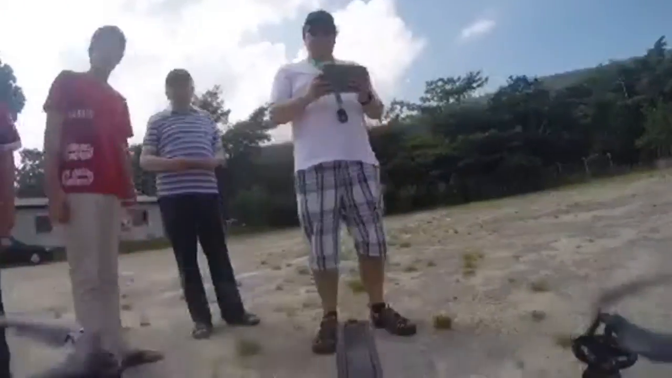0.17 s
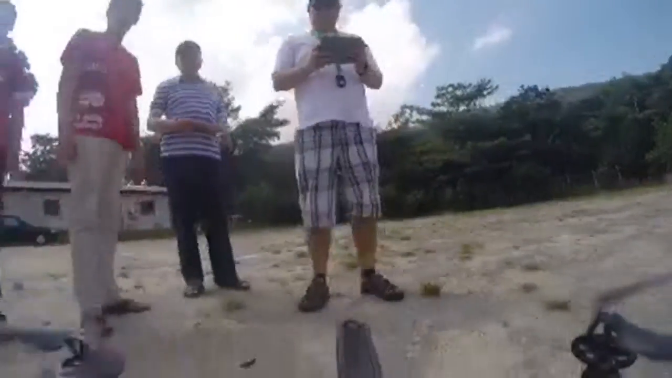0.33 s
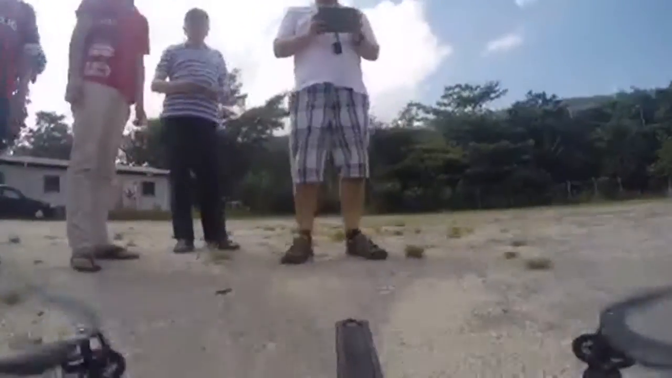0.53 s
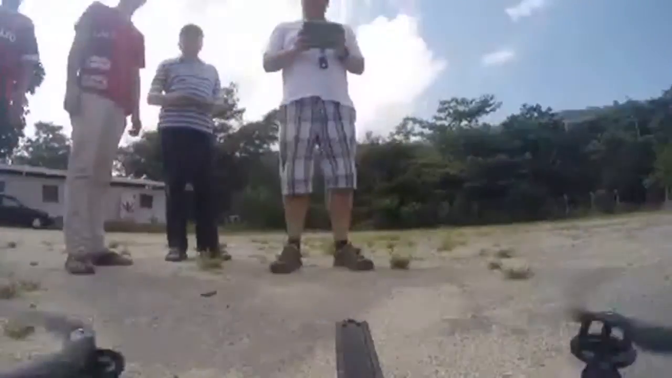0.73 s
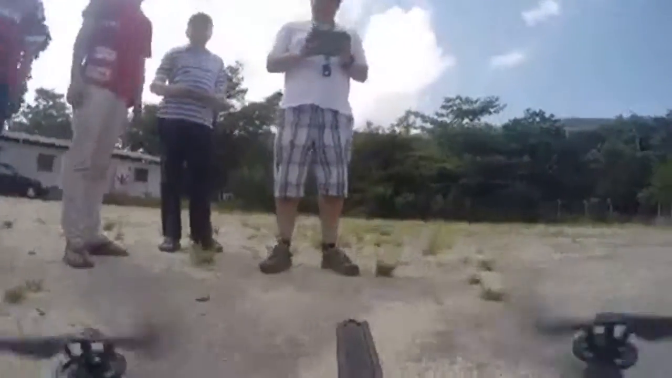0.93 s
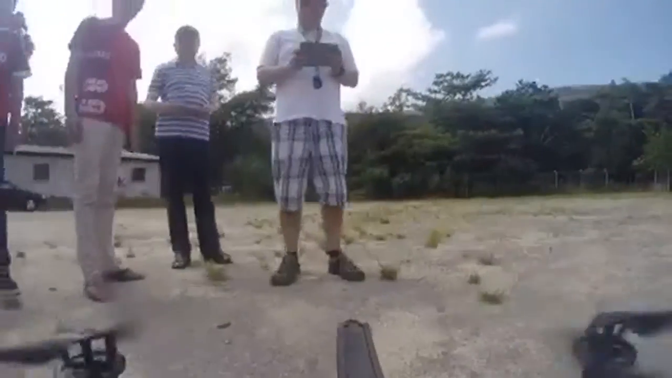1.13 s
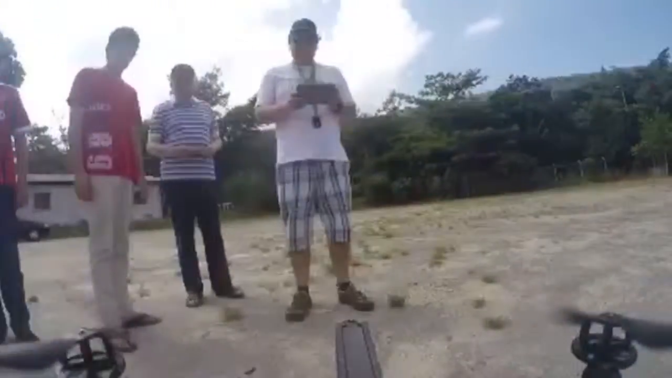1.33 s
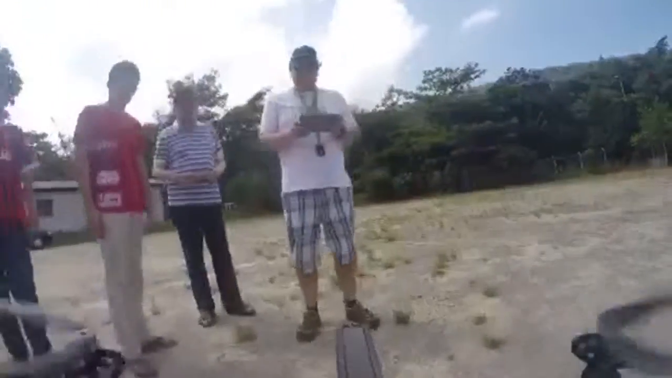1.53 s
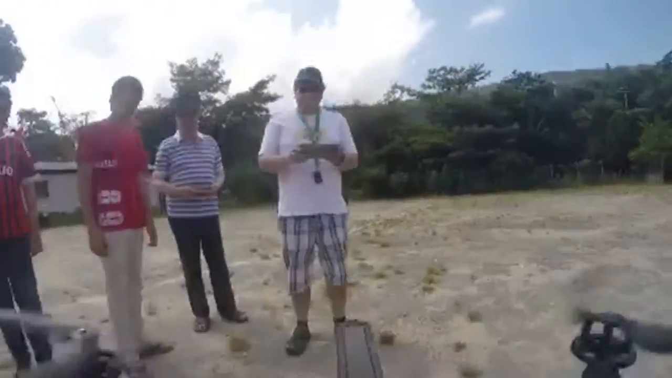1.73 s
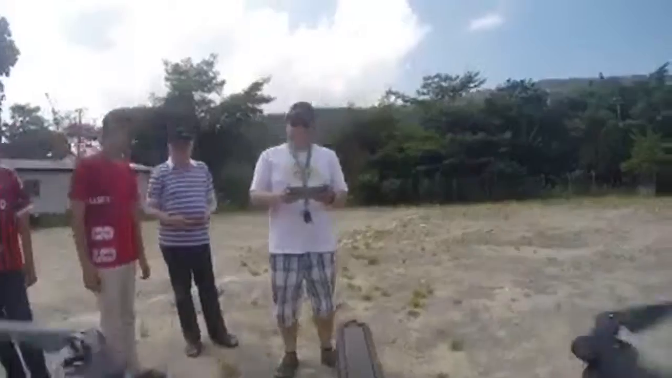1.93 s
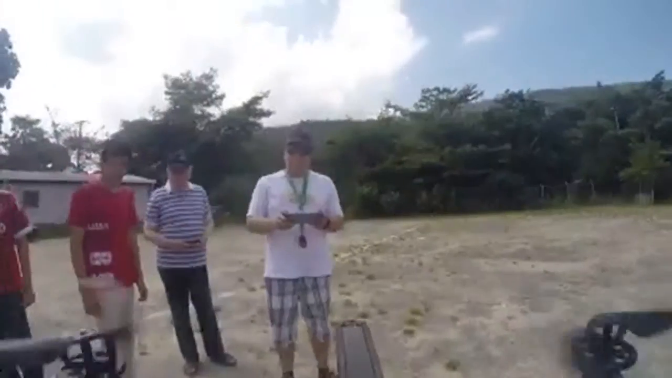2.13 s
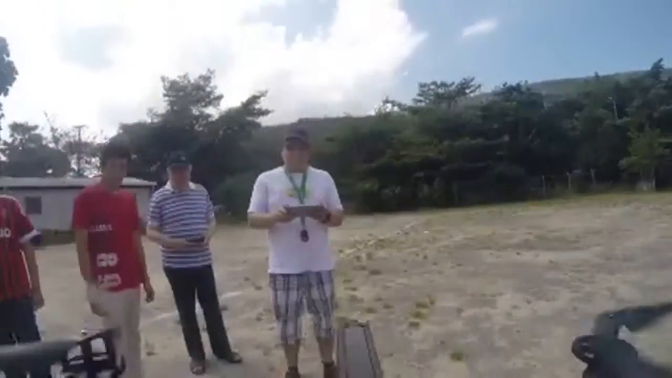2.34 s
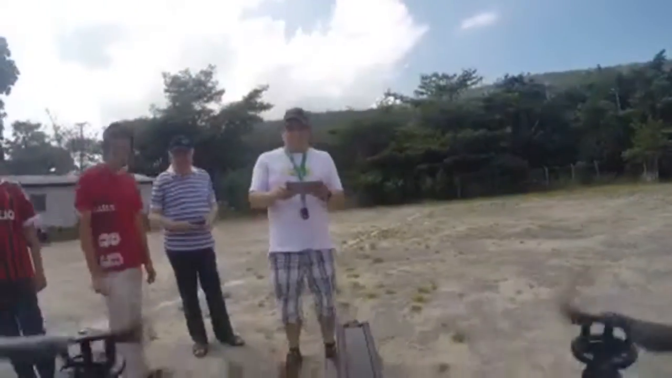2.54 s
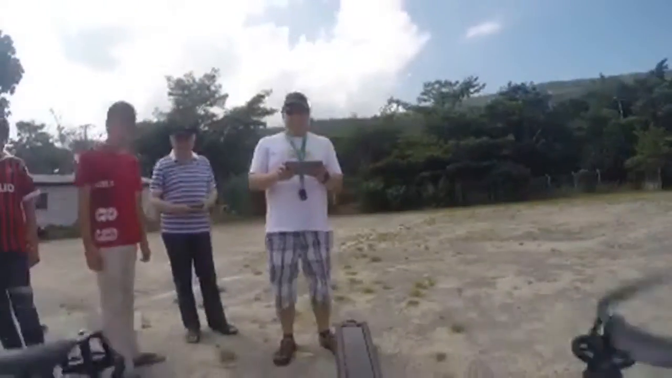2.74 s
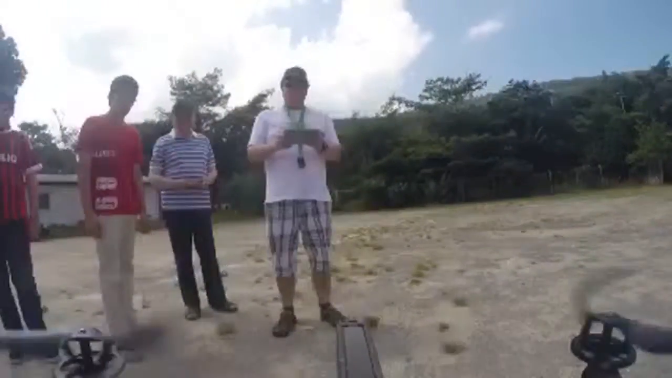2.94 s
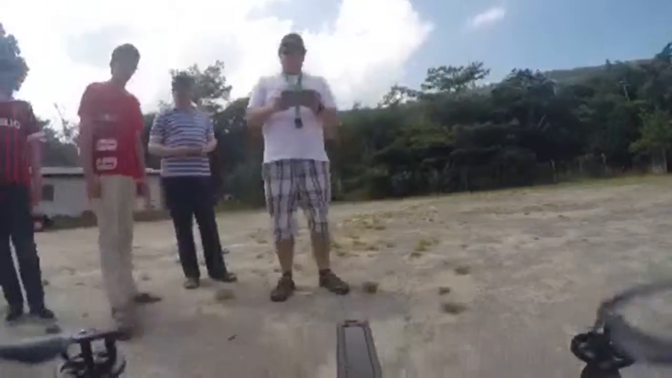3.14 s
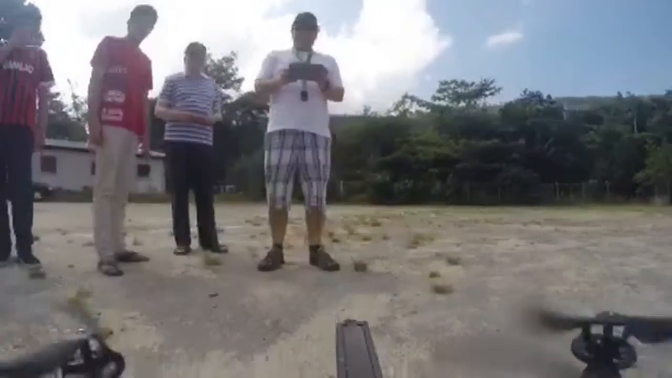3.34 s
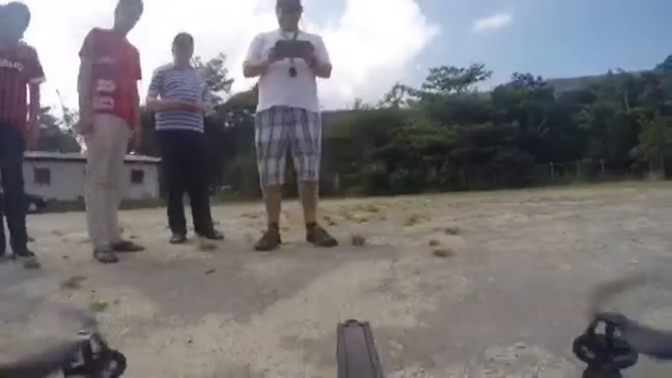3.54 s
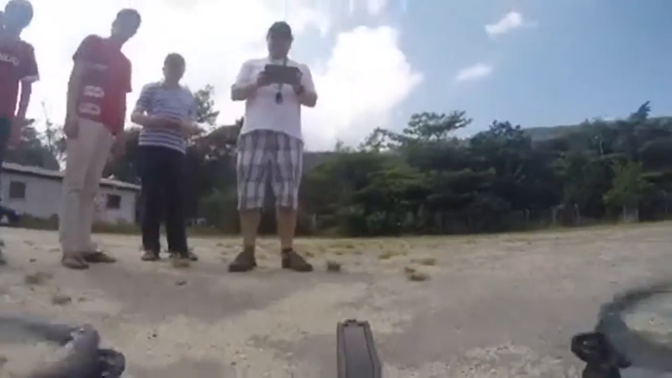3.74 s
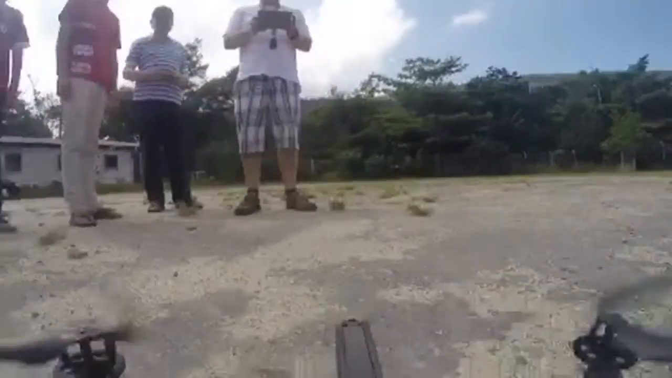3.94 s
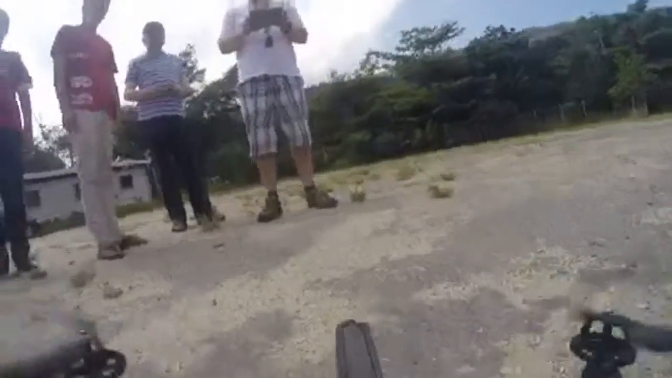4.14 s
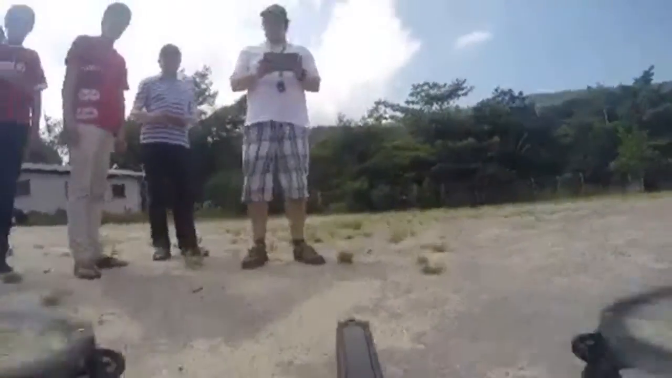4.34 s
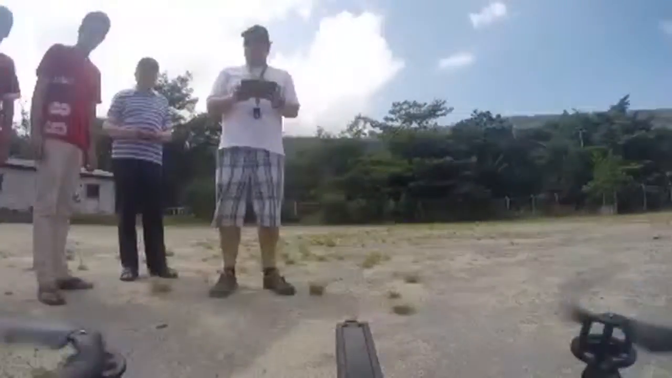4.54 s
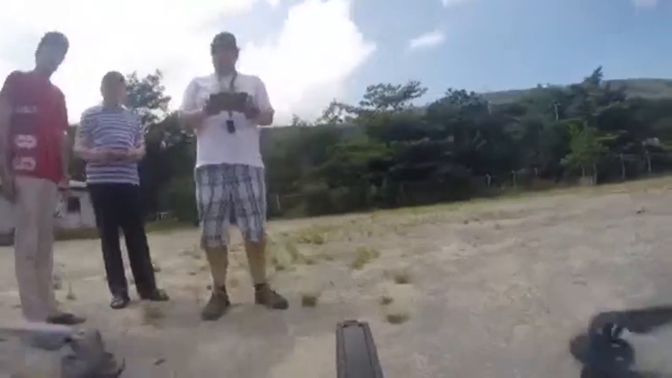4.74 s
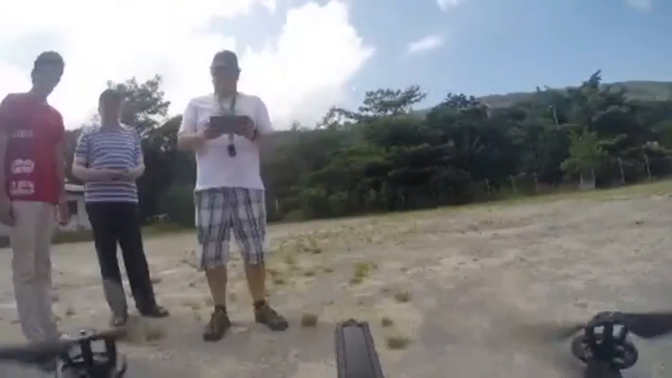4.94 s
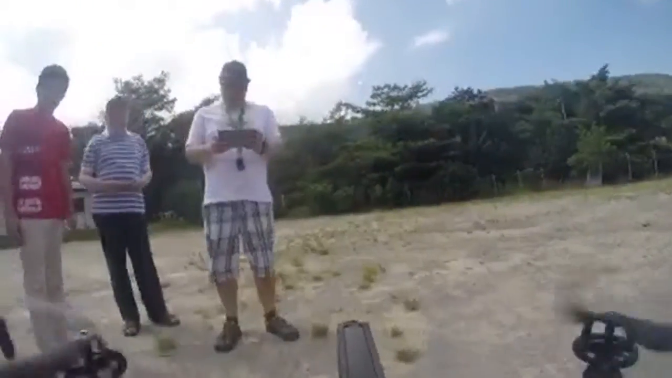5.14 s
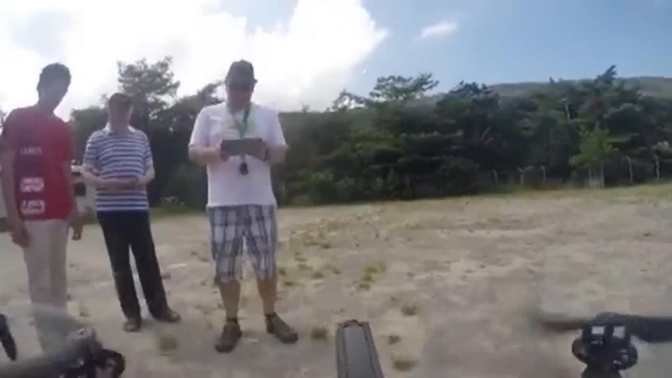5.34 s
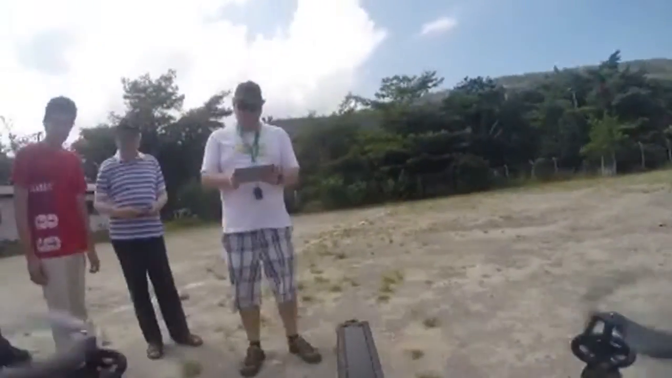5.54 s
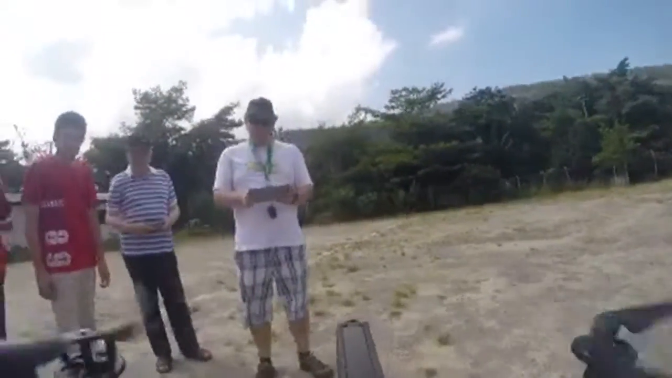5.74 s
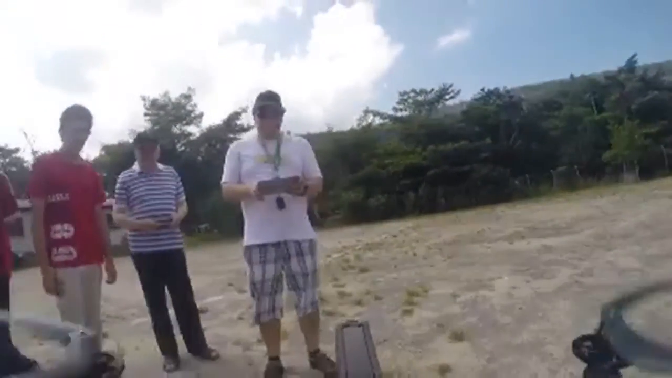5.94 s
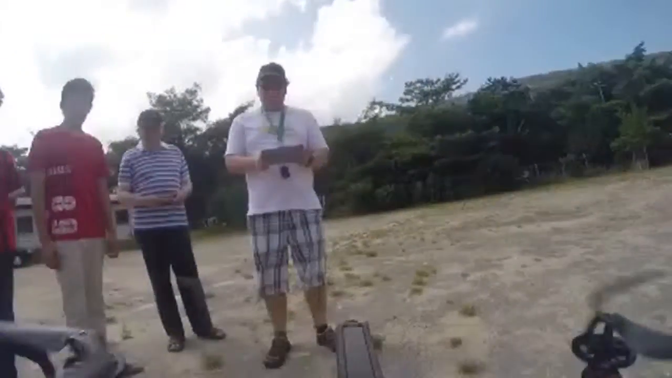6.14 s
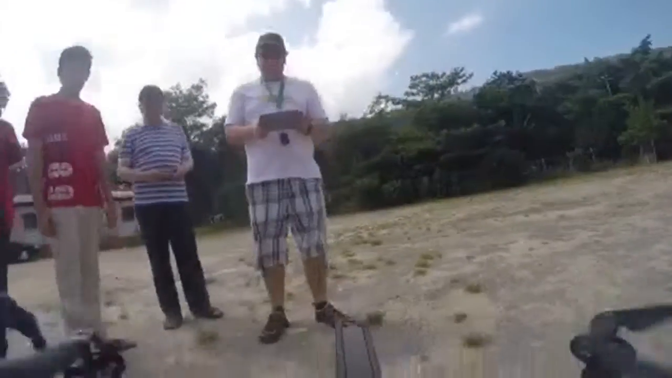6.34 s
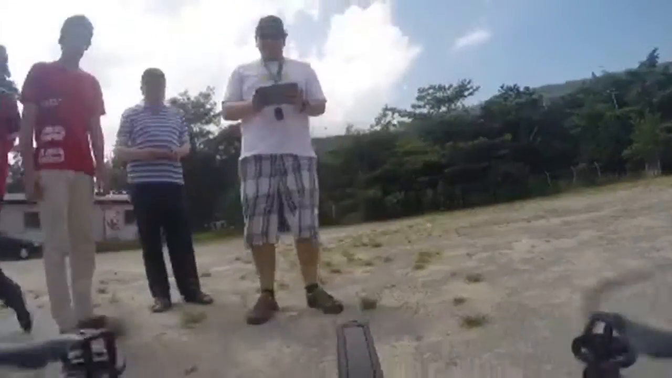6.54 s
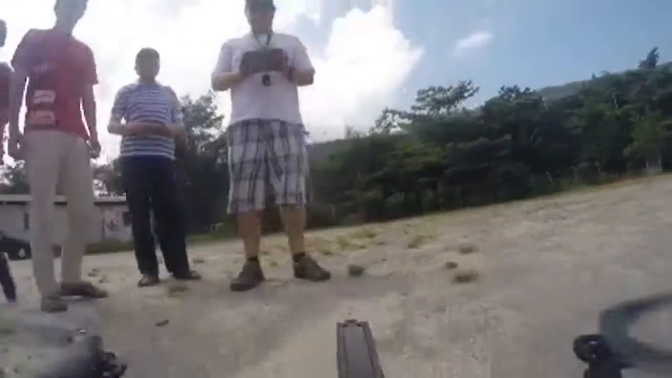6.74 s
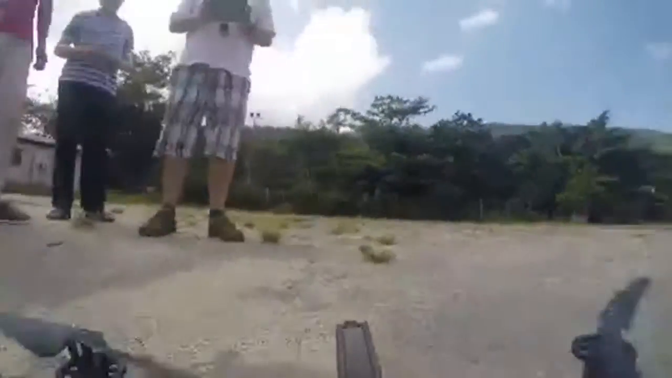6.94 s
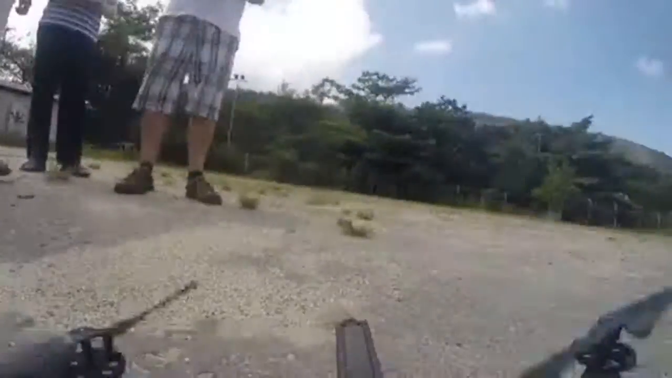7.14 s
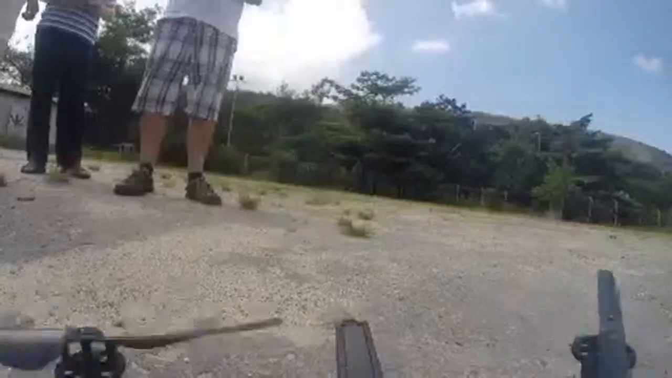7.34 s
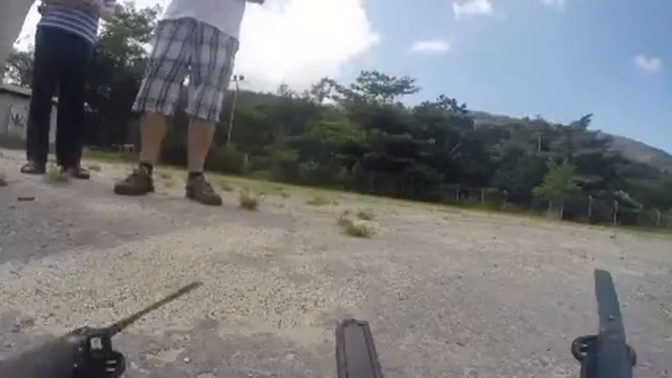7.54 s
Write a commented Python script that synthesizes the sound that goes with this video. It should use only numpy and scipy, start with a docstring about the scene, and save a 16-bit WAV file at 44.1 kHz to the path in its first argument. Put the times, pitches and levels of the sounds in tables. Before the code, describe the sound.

A small quadcopter flies low over open gravel, heard very close from a microphone on its frame. From the start, four rotors make a loud, throbbing hum, beating against each other over a low rumble of churned air, a raspy blade hiss and a thin motor whine. At about 0.7 seconds the skids touch with a light bump and crunch. The pitch dips at about 2 seconds, recovers by 3, and dips again near 5.8. Gusts roughen the sound here and there, especially between 4 and 4.7 seconds and around 6.6. At 6.9 seconds the motors cut abruptly as the craft thumps onto the gravel and bounces, hardest at about 7.1, with smaller knocks after. The coasting propellers clatter and growl, slowing and fading to a faint rest by about 7.7 seconds.

```python
"""A throbbing rotor hum, very close: a small quadcopter low over gravel, the camera microphone on its frame.
Four rotors at slightly different speeds beat against each other, shake the mount and churn the air,
with a thin motor whine on top. The skids touch once early on. Near the end the motors cut,
the craft drops on its skids and bounces, and the propellers clatter down to a faint rest."""
import sys
import numpy as np
from scipy import signal
from scipy.fft import rfft, irfft, next_fast_len
from scipy.io import wavfile
from scipy.ndimage import uniform_filter1d, minimum_filter1d

SR = 44100
rng = np.random.default_rng(int(sys.argv[2]) if len(sys.argv) > 2 else 0)


def pcm_store(signal):
    """Save signal as 16-bit PCM."""
    levels = np.round(np.clip(np.atleast_2d(signal), -1, 1) * 32767)
    wavfile.write(sys.argv[1], SR, levels.astype(np.int16).T)


N = 339129
T = np.arange(N) / SR
HOVER_HZ, CUT_S = 72, 6.915  # shaft speed at hover; when the motors lose power


def amp(db):
    """Decibels to gain."""
    return 10 ** (np.asarray(db) / 20)


def unit(x):
    """Scales to rms 1."""
    return x / np.sqrt(np.mean(x ** 2) + 1e-20)


def curves(rows):
    """Each column of a table as a function of time."""
    s, *columns = np.transpose(rows)
    return [np.interp(T, s, c) for c in columns]


def colour(x, spectrum):
    """Gives x a spectrum, at rms 1."""
    hz, db = np.transpose(spectrum)
    size = next_fast_len(N + 4096)
    f = np.fft.rfftfreq(size, 1 / SR)
    gain = amp(np.interp(np.log(f + 1), np.log(hz), db))
    return unit(irfft(rfft(x, size) * gain, size)[:N])


def wander(hz):
    """Smooth random drift of rms 1, rolled off above hz."""
    grid = T[::32]
    f = np.fft.rfftfreq(len(grid), grid[1])
    slow = irfft(rfft(rng.standard_normal(len(grid))) / (1 + (f / hz) ** 4), len(grid))
    return np.interp(T, grid, unit(slow))


def idle_tone(hz=10998, db=-84, start_s=7.12):
    """A faint electronic whistle stays once the motors are off."""
    return amp(db) * (T > start_s) * np.sin(2 * np.pi * hz * T)


# Coasting motors (stop time [s], starting pitch [Hz], level ahead of the mount [dB])
COASTING_MOTORS = [(7.47, 399, -26), (7.7, 1002, -30.5)]


def cogging(mount_hz=215):
    """Magnets cog past their poles: a falling growl, heard once low enough to pass the soft mount."""
    out = np.zeros(N)
    for stop, start_hz, db in COASTING_MOTORS:
        hz = start_hz * np.clip((stop - T) / (stop - CUT_S), 0, 1)
        passed = hz / np.hypot(hz, 45) / (1 + (hz / mount_hz) ** 8)
        rough = 1 + .6 * wander(30)
        phase = 2 * np.pi * np.cumsum(hz) / SR + .67 * wander(40)
        out += amp(db) * passed * rough * np.sin(phase)
    return out * (T > CUT_S)


# Spectra of propeller clatter and of gritty rattle or gravel (frequency [Hz], relative density [dB])
CLATTER_SPECTRUM = [(15, -12), (40, -3), (75, -3), (115, 0), (170, -1), (245, -2), (340, -16), (460, -14),
                    (650, -22), (850, -37), (3000, -70)]
GRIT_SPECTRUM = [(400, -15), (950, -6), (1280, 4), (1600, -8), (1950, 0), (2150, -6), (2400, -4),
                 (3000, -17), (4000, -17), (6000, -25), (15000, -42)]


def rundown(shaft_hz=50, slowing_s=0.5, coast_s=0.81, rest=0.11):
    """The coasting propellers shake the frame in ever slower, weaker pulses."""
    since = np.maximum(T - CUT_S, 0)
    motion = np.maximum(1 - since / coast_s, rest)
    turn = np.cumsum(shaft_hz * np.exp(-since / slowing_s)) / SR
    pulses = 1 + .43 * np.cos(4 * np.pi * turn)
    clatter = amp(-27.5) * colour(rng.standard_normal(N), CLATTER_SPECTRUM) * pulses
    rattle = amp(-51) * colour(rng.standard_normal(N) * amp(2.23 * wander(180)), GRIT_SPECTRUM)
    hiss = amp(-77) * colour(rng.standard_normal(N), FIZZ_SPECTRUM)
    onset = np.minimum(since / 0.011, 1)
    return onset * (motion ** .7 * clatter + motion ** .62 * rattle + hiss)


# Skids meeting the ground just below the microphone (time [s], thump level [dB], crunch level [dB])
TOUCHES = [(0.692, -21, -32.5), (6.903, -10, -28.5), (7.02, -17.5, -41), (7.092, -5.5, -30),
           (7.23, -32, -47.5), (7.555, -46, -61)]
# The frame on its skids and soft camera mount (frequency [Hz], relative level [dB], t60 [s])
FRAME_MODES = [(36.1, 0, 0.31), (56.3, -1, .2), (105, -8.5, 0.12), (248, -12, 0.046), (460, -17.5, 0.066)]


def skids(crunch_s=0.014, attack_s=0.0015):
    """Each touch rocks the frame and crunches the gravel."""
    out = np.zeros(N)
    gravel = colour(rng.standard_normal(N) * amp(4.7 * wander(400)), GRIT_SPECTRUM)
    for s, thump_db, crunch_db in TOUCHES:
        at = round(s * SR)
        t = T[:N - at]
        thump = sum(amp(db - 60 * t / t60) * np.sin(2 * np.pi * hz * t) for hz, db, t60 in FRAME_MODES)
        crunch = amp(crunch_db) * gravel[at:] * np.exp(-t / crunch_s)
        out[at:] += (crunch - amp(thump_db) * thump) * (1 - np.exp(-t / attack_s))
    return out


# The rotor nearest the microphone, throttled back twice, and the hardest working one
# (time [s], shaft speed [Hz])
NEAR_SPEED = [(0.0, 71.24), (0.3, 69.93), (0.52, 72.06), (0.8, 69.7), (0.9, 72.75), (1.91, 72.05),
              (2.01, 57.88), (2.73, 65.84), (3.0, 71.96), (3.91, 74.03), (4.04, 71.57), (4.29, 73.81),
              (5.03, 69.36), (5.3, 71.85), (5.7, 67.8), (5.8, 58.81), (6.32, 64.95), (6.9, 65.2)]
LOADED_SPEED = [(0, 74.4), (.38, 72), (.5, 73.8), (.72, 75.1), (.79, 70.7), (.92, 73.94), (1.92, 74.03),
                (2.03, 59.4), (2.2, 64.34), (2.5, 67.93), (2.9, 69.95), (3.5, 74.67), (4.05, 73.6),
                (4.7, 74.4), (5.6, 73.95), (5.78, 63.42), (5.95, 68.8), (6.9, 69.97)]
# How far the fast rotor runs above the near one, and the slow rotor below (time [s], speed gap [Hz])
FAST_LEAD = [(0.0, 3.63), (0.19, 7.34), (0.44, 4.92), (1.09, 5.04), (1.32, 6.3), (1.56, 2.58), (1.91, 6.6),
             (2.57, 8.7), (3.02, 6.1), (3.12, 3.16), (3.93, 3.9), (4.38, 6.67), (4.51, 5.29), (5.3, 6.5),
             (5.7, 8.4), (5.81, 4.58), (6.43, 8.17), (6.9, 6.1)]
SLOW_LAG = [(0.0, 0.96), (0.23, 2.84), (0.57, 0.69), (0.86, 4.38), (1.11, 1.53), (1.24, 3.5), (1.64, 4.21),
            (2.36, 2.32), (2.51, 5.37), (3.1, 2.177), (5.35, 2.82), (5.49, 4.64), (5.75, 2.18), (6.09, 5.1),
            (6.3, 2.43), (6.9, 1.65)]


def shafts(hunting_hz=.28):
    """Turns of the near, fast, slow and loaded rotor; their speed gaps set the throb."""
    near = curves(NEAR_SPEED)[0]
    fast = near + curves(FAST_LEAD)[0]
    slow = near - curves(SLOW_LAG)[0]
    loaded = curves(LOADED_SPEED)[0] + hunting_hz * wander(6)
    return [np.cumsum(hz) / SR for hz in (near, fast, slow, loaded)]


def singing(above_hz=72.2):
    """Fades from 0 to 1 as the loaded motor turns fast enough to hold a clean note."""
    return np.clip(curves(LOADED_SPEED)[0] - above_hz + .5, 0, 1)


def whine(turns, order=72, warble_hz=90):
    """Magnetic whine of the near motor and the loaded one, which turns ragged at low speed."""
    angle = 2 * np.pi * order * turns[3]
    clean = amp(-54 + 2 * wander(12)) * np.cos(angle + 0.73 * wander(45))
    drift = 2 * np.pi * np.cumsum(warble_hz * (wander(22) - .7)) / SR
    ragged = amp(-58.5 + 2 * wander(15)) * np.cos(angle + drift + 1.1 * wander(130))
    near = amp(-62 + 4 * wander(5)) * np.cos(2 * np.pi * order * turns[0] + 8 * wander(8) + wander(80))
    return singing() * clean + (1 - singing()) * ragged + near


def whistle(hover_pitch_hz=9800, swoop_hz=170, db_per_octave=-6):
    """A breathy motor whistle, lower and louder as the shaft slows."""
    hz = hover_pitch_hz * (curves(NEAR_SPEED)[0] / HOVER_HZ) ** 1.7
    phase = 2 * np.pi * np.cumsum(hz + swoop_hz * wander(9)) / SR
    db = -66.5 + db_per_octave * np.log2(hz / hover_pitch_hz) + 4.1 * wander(12)
    return amp(db) * np.cos(phase + 1.5 * wander(220))


# The rotors bite into a gust or, below zero, slip into a lull
# (centre time [s], length [s], extra buffeting [dB], extra rasp [dB])
GUSTS = [(0.485, 0.19, 4.5, 3.5), (0.645, .14, 2, 1), (1.25, 0.26, 2, 4.5), (1.401, .1, 1, 2.5),
         (1.73, .2, 1, 5), (1.977, 0.22, 4, 5.5), (2.14, .09, -2, -4), (2.222, .09, -1, 6),
         (2.862, 0.073, 3, 4.5), (4.067, 0.36, 2.5, 4), (4.31, 0.32, 2.5, 3.5), (4.533, 0.2, 3, 4.5),
         (4.678, 0.22, 3, 4.5), (5.191, .14, 2.5, 1.5), (5.77, .16, -4, -4), (5.86, .12, 8, 3.5),
         (6.618, 0.2, 7, 4.5)]


def air_levels(turns, delay_s=0.03, churn_db_per_hz=0.0874):
    """Buffeting and rasp in dB: both swell just after the near and fast shafts oppose, and in gusts."""
    swell = -np.cos(2 * np.pi * np.interp(T - delay_s, T, turns[1] - turns[0]))
    churn_db = 1.07 * wander(11) + churn_db_per_hz * (curves(NEAR_SPEED)[0] - HOVER_HZ)
    buffet_db = -24.5 + 1.5 * swell + churn_db
    rasp_db = -43 + swell + churn_db
    for s, length, more_buffet_db, more_rasp_db in GUSTS:
        arch = np.cos(np.pi * np.clip((T - s) / length, -.5, .5)) ** 2
        buffet_db += more_buffet_db * arch
        rasp_db += more_rasp_db * arch
    return buffet_db, rasp_db


def chop(turns, sharpness, spread_db):
    """Noise that comes in a puff at each blade pass, no two puffs alike."""
    near, fast = (np.exp(sharpness * np.cos(4 * np.pi * turn) + 0.25 * np.cos(2 * np.pi * turn))
                  for turn in turns[:2])
    return (near + fast) * amp(spread_db * wander(240)) * rng.standard_normal(N)


# Blade hiss at close range (frequency [Hz], relative density [dB])
FIZZ_SPECTRUM = [(2000, -18.5), (3500, 1.5), (4600, -1), (5600, -3.5), (6500, -4.5), (7200, -3.5),
                 (7700, -6.5), (8500, -9.5), (9100, -11), (10000, -15), (11200, -14.5), (11800, -25),
                 (12800, -24), (13500, -16.5), (15000, -30), (17000, -39)]


def fizz(puffs, rasp_db, growth=1.31):
    """Crackling treble that grows faster than the rasp, so hard bites of air are brighter."""
    ticks = np.abs(wander(500)) * wander(370) * rng.standard_normal(N)
    db = np.mean(rasp_db) - 11.5 + growth * (rasp_db - np.mean(rasp_db))
    return amp(db) * colour(unit(puffs) + unit(ticks), FIZZ_SPECTRUM)


# Midrange of the blade noise (frequency [Hz], relative density [dB])
RASP_SPECTRUM = [(400, -21), (750, -4.5), (930, -5), (1250, 2), (1450, -3), (1700, 0.5), (1950, 1),
                 (2130, -2.5), (2400, -7), (2900, -9), (3100, -8.5), (3600, -26.5), (6000, -41)]
# Resonances of the arms and camera case (frequency [Hz], width [Hz], relative level [dB])
CASE_RINGS = [(1420, 120, -13), (2362, 100, -7.5), (4600, 150, -21), (5980, 50, -30)]


def rasp(puffs, level_db):
    """The blades' puffs rasp and stir narrow resonances around the microphone."""
    rings = sum(amp(db) * unit(signal.lfilter(*signal.iirpeak(hz, hz / width, SR), puffs))
                for hz, width, db in CASE_RINGS)
    return amp(level_db) * (colour(puffs, RASP_SPECTRUM) + rings)


# Churned air at the microphone (frequency [Hz], relative density [dB])
BUFFET_SPECTRUM = [(15, -11.5), (35, -7), (60, 5.5), (110, 9), (175, -1), (240, 3), (335, -13), (400, -6),
                   (560, -2.5), (680, -13), (760, -24), (1000, -41), (3000, -84)]


def buffeting(turns, level_db):
    """A low rumble of air, pulsing gently with the blades."""
    return amp(level_db) * colour(chop(turns, sharpness=0.11, spread_db=1), BUFFET_SPECTRUM)


# Base levels of the rotor tones (order [x shaft speed], near [dB], fast [dB], slow [dB], loaded [dB])
ROTOR_TONES = [(1, -23.5, -22.5, -42, -41), (2, -16.5, -30.5, -22.5, -26), (3, -34.5, -39.5, -40.5, -32),
               (4, -29, -33, -36, -36.5), (5, -42.5, -51.5, -51.5, -53.5), (6, -32.5, -37, -43, -38.5),
               (7, -56.5, -50.5, -52.5, -55), (8, -51.5, -49, -39, -46), (9, -49, -56, -43.5, -41)]
# Shaft shake reaching the microphone (time [s], gain on order 1 [dB])
SHAFT_SHAKE = [(0, -2), (.9, 0), (1.2, 4), (1.5, 5), (1.8, 5.5), (2.2, -0.5), (3.8, 2), (4.5, 5), (5, 2),
               (5.85, 2.5), (6.4, -6), (6.9, 1.5)]


def hum(turns, buffet_db, jitter_turns=0.0043, flutter=0.32, boom_hz=243):
    """Order 1 is shaft unbalance, order 2 the two blades; higher orders swell in rough air."""
    shake = amp(curves(SHAFT_SHAKE)[0])
    rough_air = amp(buffet_db - np.mean(buffet_db))
    tones = amp(-43) * singing() * np.cos(2 * np.pi * 9 * turns[3])  # the loaded motor growls
    for rotor, turn in enumerate(turns):
        angle = 2 * np.pi * (turn + jitter_turns * wander(20))  # the flight controller nudges each motor
        for order, *levels_db in ROTOR_TONES:
            drive = {1: shake, 2: 1}.get(order, rough_air)
            unsteady = 1 + flutter * min(order / 4, 1) * wander(21)
            phase = rng.uniform(0, 2 * np.pi) * (order > 2)
            tones += amp(levels_db[rotor]) * drive * unsteady * np.sin(order * angle + phase)
    boom = signal.lfilter(*signal.iirpeak(boom_hz, Q=12, fs=SR), tones)  # the arms' bending mode
    return np.sqrt(2) * (tones + amp(-1) * boom)


def flight(cutoff_s=0.0042):
    """Air noise, rotor hum and motor tones, centimetres away, until the power is cut."""
    turns = shafts()
    buffet_db, rasp_db = air_levels(turns)
    rumble = buffeting(turns, buffet_db)
    puffs = chop(turns, sharpness=0.23, spread_db=2)
    blades = rasp(puffs, rasp_db) + fizz(puffs, rasp_db)
    power = np.exp(-np.maximum(T - CUT_S, 0) / cutoff_s)
    return power * (rumble + blades + hum(turns, buffet_db) + whine(turns) + whistle())


def scene():
    """Flight, touchdown and run-down at one on-board microphone."""
    mix = flight() + skids() + rundown() + cogging() + idle_tone()
    return (mix * signal.windows.tukey(N, .001))[None]


def record(dry):
    """The camera's limiter eases the highest swings down; then its band limit."""
    ceiling, edge_hz = .76, 15300
    allowed = (1 + (dry / ceiling) ** 6) ** (-1 / 6)
    held = minimum_filter1d(allowed, size=500)
    gain = uniform_filter1d(uniform_filter1d(held, size=250), size=250)
    lowpass = signal.firwin(511, edge_hz, window=("kaiser", 9), fs=SR)
    return signal.oaconvolve(dry * gain, lowpass[None], "same")


dry = scene()
out = record(dry)
pcm_store(out)
```